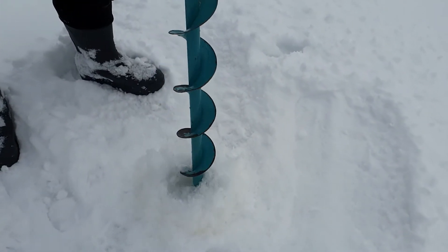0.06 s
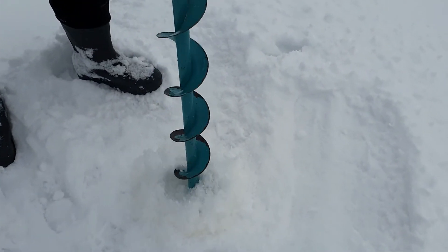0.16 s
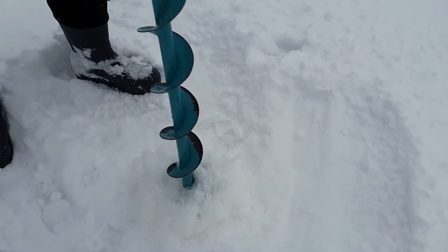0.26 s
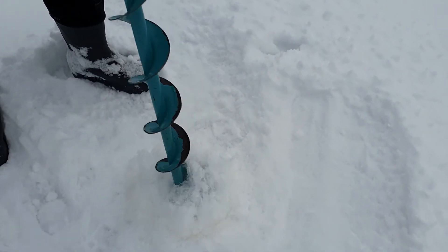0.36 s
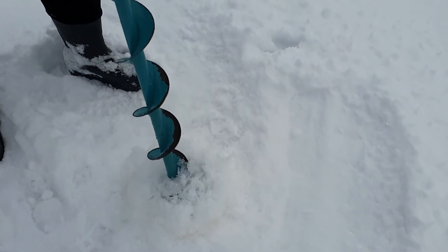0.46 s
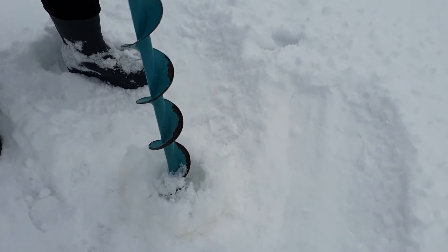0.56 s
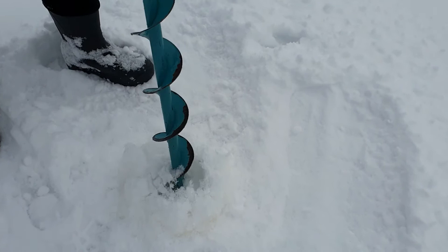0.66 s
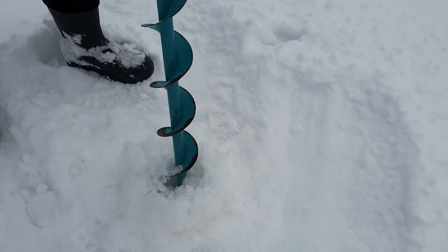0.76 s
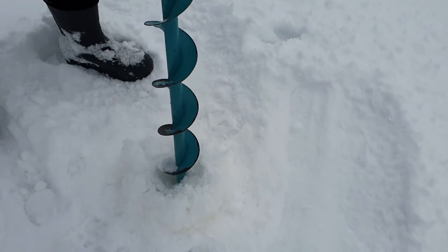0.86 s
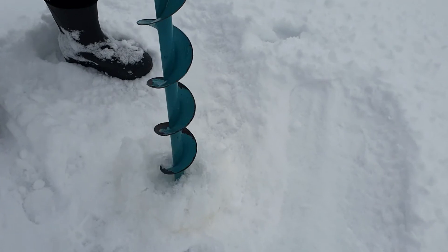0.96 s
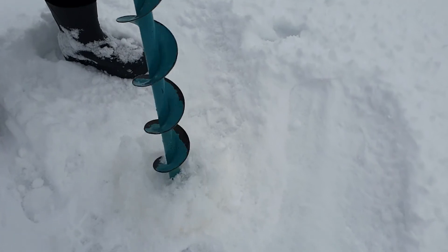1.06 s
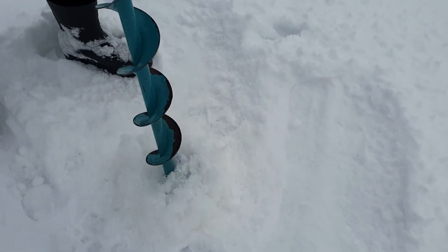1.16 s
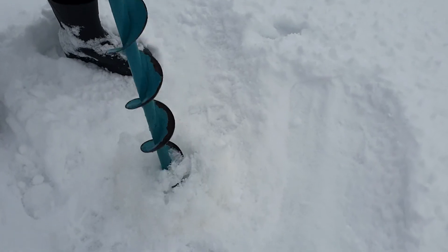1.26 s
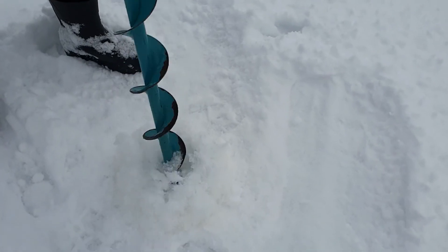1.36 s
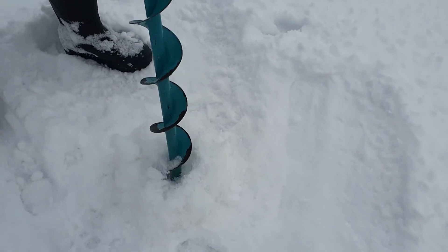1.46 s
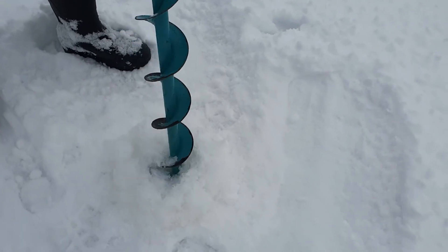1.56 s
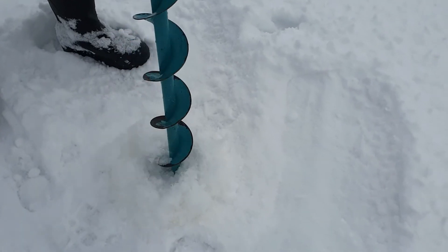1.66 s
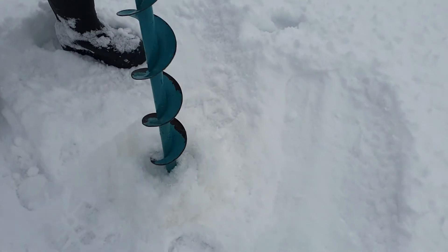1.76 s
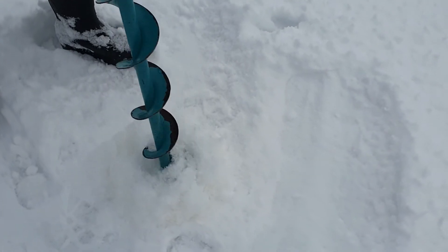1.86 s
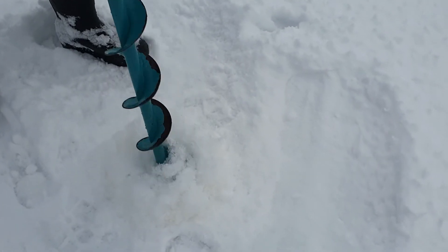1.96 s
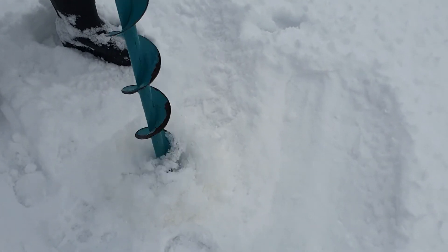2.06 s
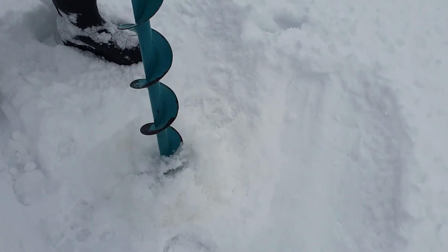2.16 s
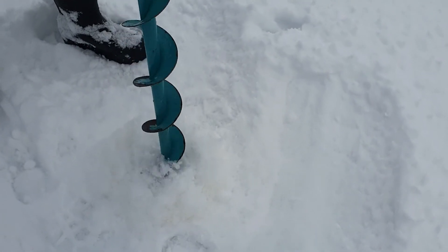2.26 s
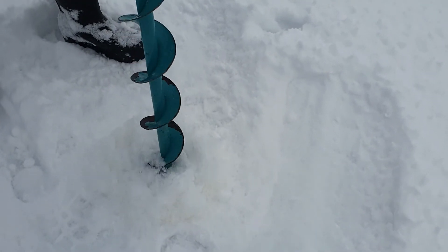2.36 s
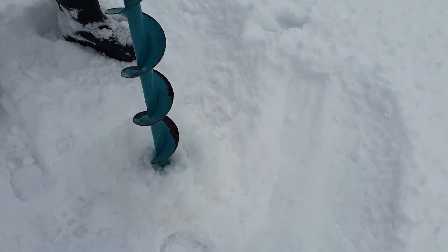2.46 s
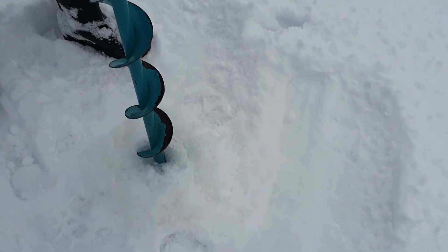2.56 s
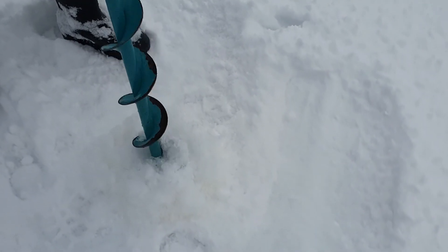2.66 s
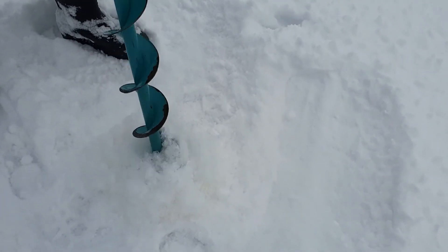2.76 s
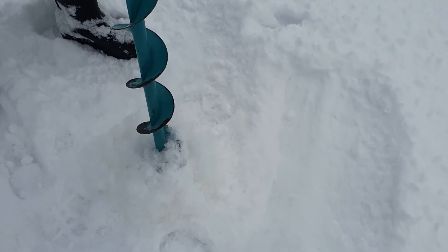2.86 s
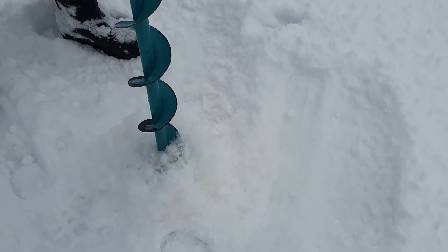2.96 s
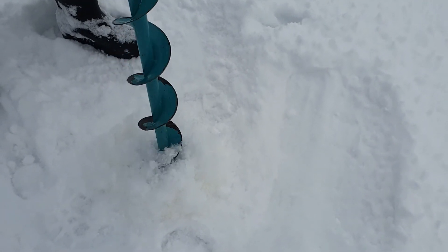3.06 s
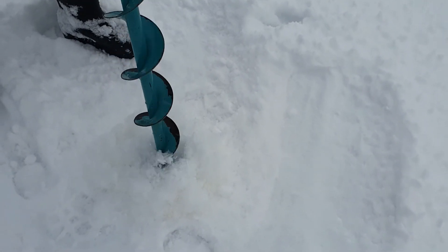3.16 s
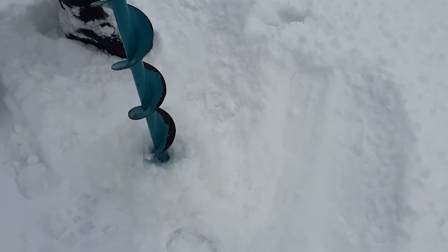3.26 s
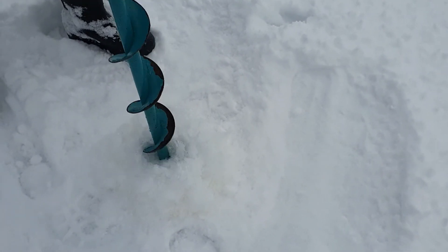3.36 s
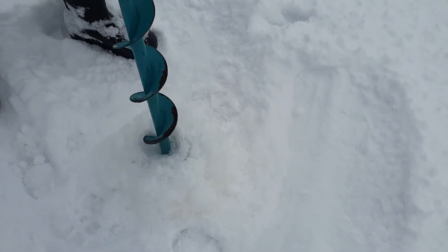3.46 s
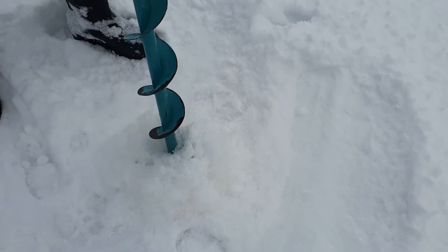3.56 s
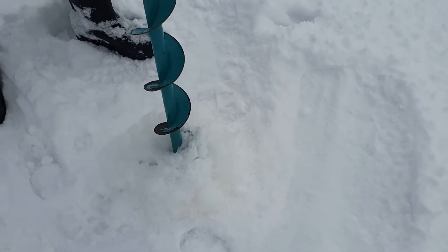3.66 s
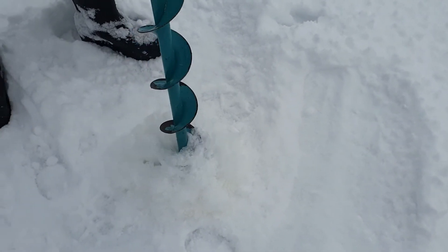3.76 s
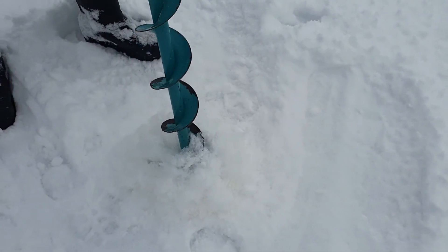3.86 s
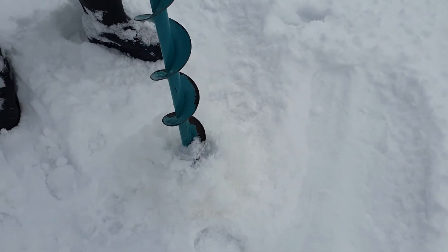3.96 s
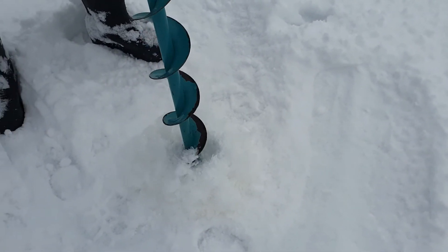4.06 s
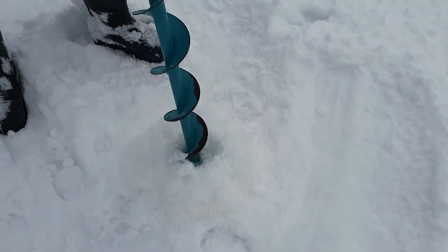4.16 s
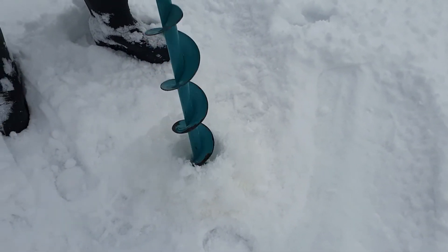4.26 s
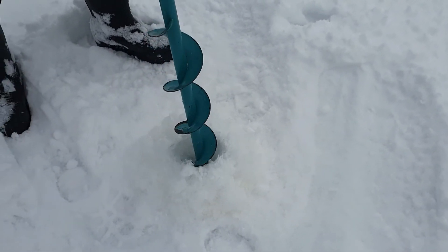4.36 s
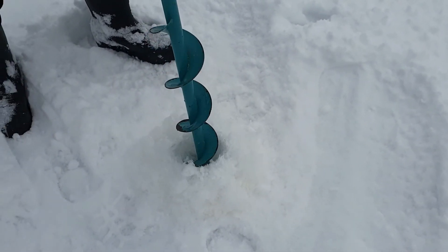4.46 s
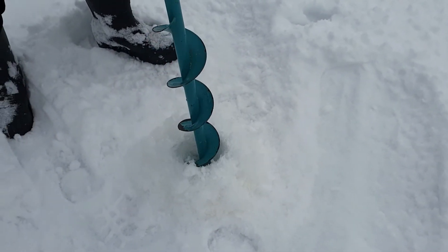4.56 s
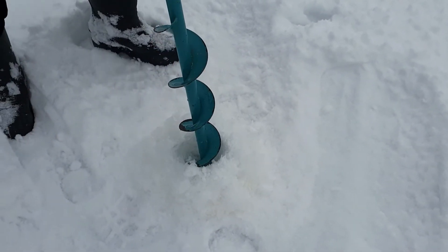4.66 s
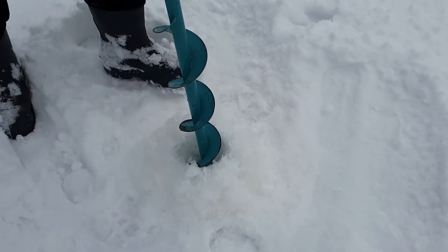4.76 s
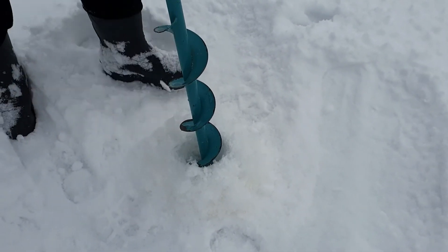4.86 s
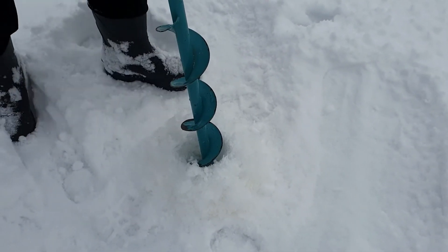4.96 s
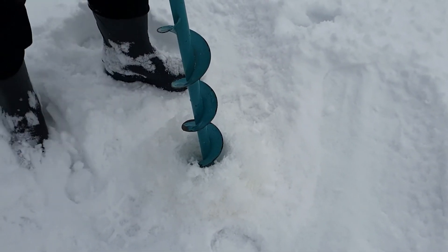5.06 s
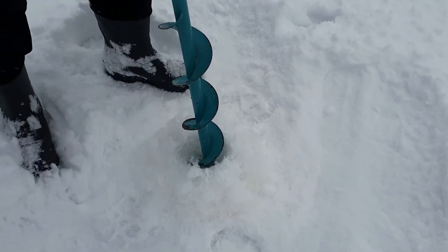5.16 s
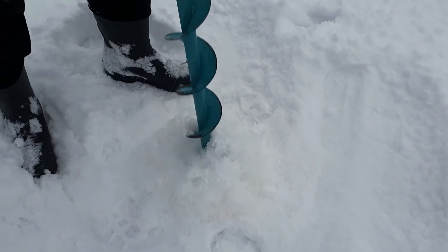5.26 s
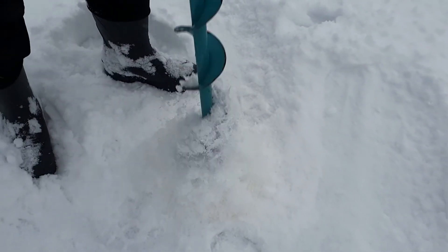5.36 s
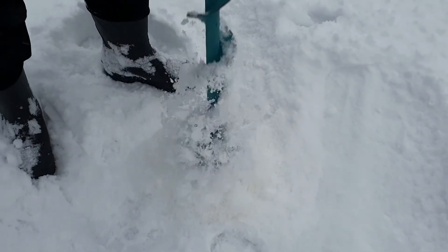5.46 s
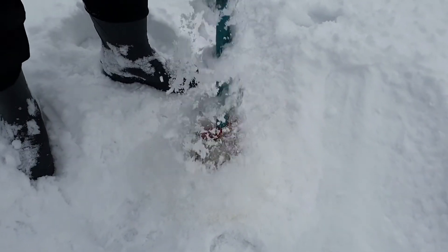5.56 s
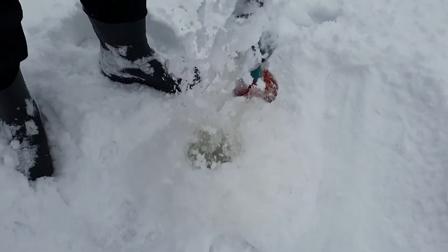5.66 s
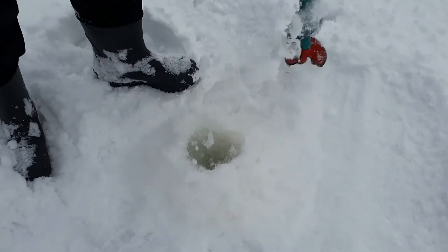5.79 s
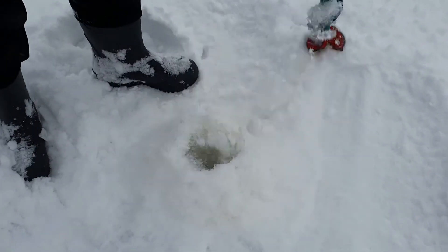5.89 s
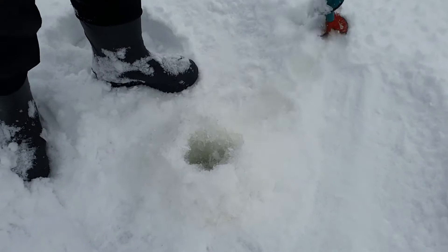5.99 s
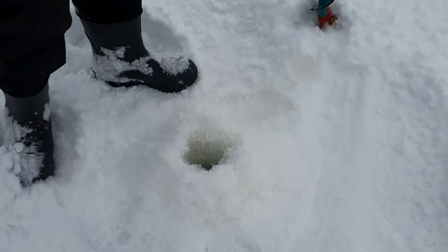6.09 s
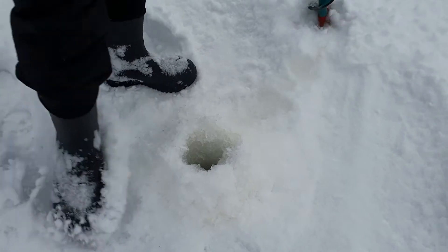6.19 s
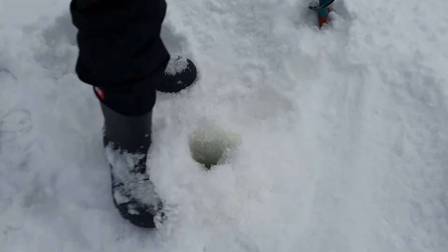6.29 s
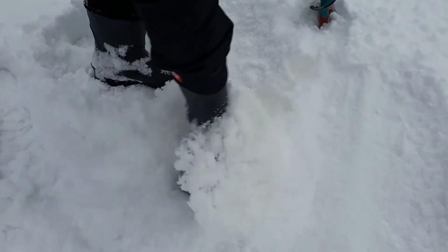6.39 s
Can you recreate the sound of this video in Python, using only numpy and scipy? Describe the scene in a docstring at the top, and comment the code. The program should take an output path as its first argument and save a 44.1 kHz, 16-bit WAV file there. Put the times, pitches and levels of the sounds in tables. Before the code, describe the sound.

Close, crunchy scraping of a steel ice auger stops suddenly, followed by a wet pull, falling slush and boots in snow.

```python
"""On a frozen river, close by, a hand auger (a big drill) bores through the ice: its blades chip away,
its steel spiral rings and the ice sheet throbs. It breaks through and falls quiet. Boots shift in the
snow, then the spiral is hauled out, scraping the wall of the hole while water gurgles behind it.
Slush hisses off it and lands in lumps, the steel clinks as it is set down, and the boots step aside."""
import sys
import numpy as np
from scipy import signal
from scipy.fft import rfft, irfft
from scipy.io import wavfile
from scipy.ndimage import uniform_filter1d, map_coordinates

SR = 44100
rng = np.random.default_rng(int(sys.argv[2]) if len(sys.argv) > 2 else 0)


def log_audio(samples):
    """Write samples as a 16-bit WAV file to the path given in sys.argv[1]."""
    # one column per channel
    frames = np.atleast_2d(samples).T
    # limit to full scale, then quantise
    limited = np.clip(frames, -1, 1)
    pcm = np.round(limited * 32767).astype(np.int16)
    wavfile.write(sys.argv[1], SR, pcm)


N = 283563
TIME, HZ = np.arange(N) / SR, np.fft.rfftfreq(N, 1 / SR)
TURN_S = 0.7226  # one turn of the crank
BREAK_S, FREE_S = 4.252, 4.372  # the blades break through, then run free


def amp(db):
    """Turns decibels into a number to multiply by."""
    return 10 ** (np.asarray(db) / 20)

def unit(x):
    """Scales a signal to an average power of 1."""
    return x / np.sqrt(np.mean(x ** 2) + 1e-20)

def read(points, hz):
    """Looks up hz on a curve of (pitch_hz, value) points."""
    pitch, value = np.transpose(points)
    return np.interp(np.log(hz + 1), np.log(pitch + 1), value)

def ramp(start_s, length_s):
    """Goes steadily from 0 to 1."""
    return np.clip((TIME - start_s) / length_s, 0, 1)

def humps(rows):
    """Adds up smooth humps from rows of (middle_s, half_length_s, height)."""
    return sum(height * np.exp(-((TIME - at) / half) ** 2) for at, half, height in rows)

def swell(start_s, db, rise_s, decay_s):
    """A loudness curve that rises smoothly to db and dies away."""
    t = np.maximum(TIME - start_s, 0)
    shape = (1 - np.exp(-(t / rise_s) ** 2)) * np.exp(-t / decay_s)
    return amp(db) * shape / (shape.max() + 1e-9)

def swells(rows):
    """Overlapping swells, added in power."""
    return np.sqrt(sum(swell(*row) ** 2 for row in rows))

def wander(rate_hz):
    """A smooth random drift, about 1 in size."""
    return unit(irfft(rfft(rng.standard_normal(N)) / (1 + (HZ / rate_hz) ** 4), N))

def crackle(per_s, spread_db, decay_s):
    """The loudness curve of many tiny, sudden cracks; a few are large."""
    size = amp(spread_db * np.minimum(rng.exponential(1, N), 4))
    cracks = size * (rng.random(N) < per_s / SR)
    power = signal.lfilter([1], [1, -np.exp(-2 / (decay_s * SR))], cracks ** 2)
    return unit(np.sqrt(power + 1e-12))

def colour(x, db_at, size=4096):
    """Shapes lows and highs by the curve db_at(hz); white noise keeps its power."""
    gain_db = np.maximum(db_at(abs(np.fft.fftfreq(size, 1 / SR))), -110)
    response = np.exp(signal.hilbert(np.log(amp(gain_db))).conj())  # rings only after a hit
    taps = np.fft.ifft(response).real[:size // 2]
    return signal.oaconvolve(x, taps[None] / np.linalg.norm(taps), axes=1)[:, :N]

def resonate(x, hz, width_hz):
    """Makes x ring at a steady or moving pitch; a narrower width rings longer."""
    spin = np.exp(2j * np.pi * np.cumsum(np.broadcast_to(hz, N)) / SR)
    keep = np.exp(-np.pi * width_hz / SR)
    once = signal.lfilter([1 - keep], [1, -keep], x / spin)
    return (spin * signal.lfilter([1 - keep], [1, -keep], once)).real

# How alike left and right are (1 = the same): pitch_hz, likeness
STEREO_LIKENESS = [(40, .7), (160, .995), (1000, .94), (2500, .93), (4000, .75), (7000, .55), (10000, .25)]
# How far the left side runs ahead: pitch_hz, lead_radians
LEFT_LEAD = [(200, 0), (1400, .28), (3500, .55), (5700, 1.65), (8400, 2.0), (15000, 1.6)]
def hiss():
    """Stereo white noise, most alike in the low and middle range, a little louder on the right."""
    left, other = rfft(rng.standard_normal((2, N)))
    same = read(STEREO_LIKENESS, HZ)
    right = (same * left + np.sqrt(1 - same ** 2) * other) * np.exp(-1j * read(LEFT_LEAD, HZ))
    return irfft(np.array([left, right]) * amp([[-0.35], [0.35]]), N)


# Where the auger rings as it stands in the ice: pitch_hz, width_hz, boost_db
STEEL_RINGS = [(158.1, 67, 16), (662, 56, 6), (1122, 200, 6.5), (1484, 90, 6.5), (1783, 90, 6.5),
               (2041, 44, 8.5), (2175, 120, 4), (2450, 40, 1.5), (2750, 70, 8), (3090, 190, 6.5),
               (3400, 130, 8.5), (5340, 59, 10.5), (5915, 33, 12.5), (6614, 92, 8.5)]
def steel_db(hz):
    """The boost that the ringing auger gives each pitch."""
    return sum(db / (1 + (2 * (hz - pitch) / width) ** 2) for pitch, width, db in STEEL_RINGS)

# The tone of breaking ice: pitch_hz, level_db
ICE_TONE = [(35, -34), (70, -19), (115, -24), (220, -12), (380, -16), (900, -13.5), (2000, -11.5),
            (3300, -19.5), (4600, -24), (7300, -19.5), (8100, -25.5), (16000, -35.5)]
def auger(x, low_hz, high_hz):
    """One band of breaking ice, rung through the auger."""
    def gain_db(hz):
        outside = (1 + (low_hz / (hz + 1)) ** 10) * (1 + (hz / high_hz) ** 10)
        return read(ICE_TONE, hz) + steel_db(hz) - 10 * np.log10(outside)
    return colour(x, gain_db)

def crank(peak_s):
    """Swings between -1 and 1 once a turn, with a top at peak_s."""
    return np.cos(2 * np.pi * (TIME - peak_s) / TURN_S)

def flex(x, pitch_share=0.005, loaded_s=0.598):
    """The crank bends the shaft, so the pitch drifts up and down once a turn."""
    lead_s = pitch_share * TURN_S / (2 * np.pi) * crank(loaded_s + TURN_S / 4)
    return np.array([map_coordinates(side, [(TIME + lead_s) * SR], order=3, mode="mirror") for side in x])

def crumbs(x, depth_db):
    """Coarse and fine crumbs take turns, so the tone shifts in small patches."""
    spectrum = signal.stft(x, nperseg=1024)[2]
    patches = uniform_filter1d(rng.standard_normal(spectrum.shape[1:]), size=7, axis=0)
    patches = unit(uniform_filter1d(patches, size=5, axis=1))
    return signal.istft(spectrum * amp(depth_db * patches))[1][:, :N]

# The arm leans in or eases off: middle_s, half_length_s, change_db
ARM_PUSHES = [(.68, 0.11, -4), (1.45, 0.036, -2), (1.89, 0.045, 2), (.38, 0.087, 1), (3.31, 0.018, 0.5),
              (3.44, 0.041, -5), (3.93, 0.048, -4), (4.1, 0.02, 1), (4.325, 0.011, 4.5)]
# Once a turn the blades dig in and shave keenly: start_s, boost_db
KEEN_CUTS = [(0, 8), (.76, 7), (1.49, 6), (2.17, 3.5), (2.94, 3), (3.56, 4.5)]
def cutting(fade_db_per_s=128):
    """How hard the blades bite, and how loud the shaving is next to that, both in dB."""
    through = ramp(BREAK_S, 0.0036)
    bite_db = -21 + humps(ARM_PUSHES) - 9 * through
    bite_db -= 13.5 * ramp(FREE_S, 0.021) + fade_db_per_s * np.maximum(TIME - FREE_S, 0)
    keen_db = sum(db * swell(start, 0, rise_s=0.053, decay_s=0.37) for start, db in KEEN_CUTS)
    muffle_db = 1.5 * ramp(1.9, 0.05)  # chips pack the hole
    shave_db = -10.5 + keen_db - muffle_db + 16 * through - 4 * ramp(FREE_S, 0.017)
    return bite_db, shave_db

# The blades catch and stand for a moment: middle_s, half_length_s, drop_db
BLADE_CATCHES = [(.623, .006, 13), (.668, .008, 15), (4.29, .008, 9), (4.356, .008, 9)]
def blades():
    """The same cracks make a coarse grind, fine shaving and a fizz of powder, over singing steel."""
    bite_db, shave_db = cutting()
    slack_db = humps([(at - .005, .006, 3) for at, _, _ in ICE_CHIPS])  # a dip just before each chip
    bite = amp(bite_db - humps(BLADE_CATCHES) - slack_db)
    cracks = crackle(per_s=950, spread_db=2.4, decay_s=.0014) + .6
    cracks *= amp(2.1 * np.tanh(wander(rate_hz=30)))  # the ice gives way in clusters
    cracks /= np.sqrt(uniform_filter1d(cracks ** 2, size=4000))  # but the blades sink steadily
    grind = auger(hiss() * cracks * bite, low_hz=393, high_hz=3030)
    grind = amp(-1) * crumbs(grind, depth_db=1.97)
    fine = hiss() * cracks * bite
    shaving = amp(1) * auger(fine * amp(shave_db), low_hz=3340, high_hz=8730)
    powder_db = -5 + 0.43 * shave_db + 5.1 * (TIME > BREAK_S)
    powder = amp(powder_db) * auger(fine, low_hz=8020, high_hz=16430)
    squeal = amp(shave_db - 13.5) * steel_tone(5830, drift_hz=110, width_hz=400, flare_db=4)
    return flex(grind + crumbs(shaving + powder, depth_db=2.5)) + bite * (singing() + squeal)

def steel_tone(pitch_hz, drift_hz, width_hz, flare_db):
    """The steel answers the scraping edge at a drifting pitch, flaring up and fading."""
    hz = pitch_hz + drift_hz * wander(rate_hz=4)
    return unit(resonate(hiss(), hz, width_hz) * amp(flare_db * np.tanh(wander(rate_hz=7.2))))

# The notes of the spiral: pitch_hz, width_hz, level_db, swing_db, climb_hz
SPIRAL_NOTES = [(1490, 70, -14, 1, 0), (2050, 55, -10.5, 2, 0), (2120, 110, -9, 4, 320),
                (2740, 110, -14.5, 5, 0)]
def singing():
    """Scraping keeps the steel ringing; in each turn the ring swells and one note climbs."""
    climb, load = (TIME / TURN_S % 1) ** 3, crank(peak_s=0.39)
    notes = 0
    for hz, width, db, swing_db, climb_hz in SPIRAL_NOTES:
        note = steel_tone(hz + climb_hz * climb, drift_hz=12, width_hz=width, flare_db=3)
        notes += amp(db) * unit(note * amp(swing_db * load))
    return notes * amp(-12 * ramp(BREAK_S, 0.1))  # the load goes as the blades break through

# The ice takes more or less of the weight: middle_s, half_length_s, change_db
ICE_HEAVES = [(1.52, 0.033, -7), (1.78, 0.017, 7), (2.8, 0.016, 5.5), (3.83, 0.03, 5)]
def ice_sheet(lurches_per_s=11):
    """The ice throbs low, swelling with each slightly uneven lurch of the blades."""
    lurch = np.sin(2 * np.pi * np.cumsum(lurches_per_s + wander(rate_hz=2.66)) / SR)
    throb_db = -34.5 + humps(ICE_HEAVES) + 1.5 * lurch + 1.2 * wander(rate_hz=3.2)
    throb = amp(throb_db) * (1 - ramp(BREAK_S, 0.16))
    return auger(hiss() * throb, low_hz=29.4, high_hz=347)

# The tone of open air: pitch_hz, level_db
AIR_TONE = [(25, -2), (80, 0), (200, -17), (2000, -23), (6500, -26), (16000, -34)]
def air():
    """Open air rumbles faintly throughout."""
    return amp(-64) * colour(hiss(), lambda hz: read(AIR_TONE, hz))

# The cutting edge skids: middle_s, half_length_s, level_db, pitch_hz
EDGE_SKIDS = [(.1, 0.063, -25, 3200), (0.835, 0.028, -25, 3110), (1.88, 0.083, -24, 2700)]
def skids():
    """Each skid draws a short metallic rasp from the spiral."""
    grips = np.array([humps([(at, half, amp(db))]) for at, half, db, _ in EDGE_SKIDS]) + 1e-9
    hz = np.average([[pitch] for *_, pitch in EDGE_SKIDS] * np.ones(N), axis=0, weights=grips)
    rasp = colour(resonate(hiss(), hz, width_hz=520), steel_db)
    return unit(rasp * amp(2 * wander(rate_hz=47))) * grips.sum(0)

# Larger chips of ice: start_s, level_db, pitch_hz
ICE_CHIPS = [(.468, -17, 1750), (.6295, -19, 2380), (.6748, -17.5, 2420), (.9751, -17, 2150),
             (1.264, -17, 1200), (1.4779, -18, 2000), (2.184, -16, 1800), (2.222, -16, 1750),
             (2.5246, -16.5, 1650), (3.0239, -18, 2200), (3.1651, -16, 2650), (3.203, -15.5, 2000),
             (3.6485, -15.5, 1550), (3.6749, -17, 1700), (3.873, -16, 2000), (3.9847, -15.5, 2450),
             (4.093, -15.5, 1350), (4.1139, -14.5, 1800), (4.2337, -16.5, 1900), (4.263, -25, 3400),
             (4.299, -23, 3400), (4.3639, -20.5, 2750), (4.5236, -50, 3300), (5.566, -29, 2100)]
def chips(rise_s=0.0012, decay_s=0.0034):
    """Each chip snaps against the steel: a short burst of noise with its own pitch."""
    out, noise, t = np.zeros((2, N)), hiss(), TIME[TIME < 10 * decay_s]
    shape = (1 - np.exp(-t / rise_s)) * np.exp(-t / decay_s)
    for start_s, db, pitch in ICE_CHIPS:
        def gain_db(hz):
            off_pitch = 4.6 * (hz / pitch - pitch / (hz + 1))
            return 0.72 * steel_db(hz) - 10 * np.log10(1 + off_pitch ** 2)
        start = round(start_s * SR)
        snap = colour(noise[:, start:start + len(t)] * shape, gain_db)
        strength = np.sqrt(np.mean(snap[:, :round(2 * decay_s * SR)] ** 2))
        out[:, start:start + snap.shape[1]] += amp(db) * snap / strength
    return out

# Dull blows of boots, auger and slush lumps: start_s, level_db, pitch_hz, decay_s, relative_crunch_db
BLOWS = [(4.244, -28, 100.5, 0.01, -20), (4.723, -34.5, 164, 0.0073, -15), (4.882, -34.5, 123, 0.022, -12),
         (5.0604, -19.5, 190, 0.0077, -10.5), (5.196, -34, 100, .009, -20), (5.242, -26.5, 175, 0.0086, -4),
         (5.323, -16, 160, 0.007, -4.5), (5.488, -25, 333, 0.0075, -14), (5.815, -13, 448, 0.0043, -10.5),
         (5.835, -10.5, 550, 0.0023, -14), (5.842, -29, 129, 0.017, -10), (5.873, -17, 119, 0.0051, -13.5),
         (5.966, -37, 155, 0.011, -10.5), (6.028, -36.5, 169, 0.013, -2), (6.107, -26.5, 216, 0.0082, -8.5),
         (6.154, -33, 105, 0.015, -18), (6.184, -23.5, 122, 0.0086, -6.5), (6.3, -27.5, 299, 0.0057, -11.5),
         (6.422, -15, 520, 0.0033, -7)]
# A boot rolls its weight onto the snow: start_s, level_db, rise_s, decay_s
BOOT_STEPS = [(4.85, -50, 0.023, 0.031), (4.95, -56, 0.016, 0.48), (5.16, -42, 0.022, 0.011),
              (6.26, -38.5, 0.011, 0.13), (6.33, -36, 0.026, 0.043), (6.39, -30, 0.027, 0.052)]
# The tone of snow packed under a sole: pitch_hz, level_db
SNOW_TONE = [(100, -10), (220, -3), (1300, -9.5), (2000, -15.5), (6000, -20), (16000, -27)]
def thuds_and_steps(pitch_sag=0.13):
    """Each blow is a short thump that sinks in pitch; snow crunches under blows and boots."""
    thumps, weight = np.zeros(N), np.zeros(N)
    for start, db, hz, decay, crunch_db in BLOWS:
        t = np.maximum(TIME - start, 0)
        shape = swell(start, db, 0.22 * decay, decay)
        stretch = 1 + pitch_sag * (1 - np.exp(-t / decay / 2))
        thumps += shape * np.sin(2 * np.pi * hz * t / stretch)
        weight += shape * amp(crunch_db)
    thumps = signal.sosfilt(signal.butter(3, 55, "high", fs=SR, output="sos"), thumps)
    grains = hiss() * unit(crackle(per_s=1300, spread_db=1.5, decay_s=0.0011) + .5)
    crunch = colour(grains * (weight + swells(BOOT_STEPS)), lambda hz: read(SNOW_TONE, hz))
    rumble_tone = [(30, -17), (110, -1.5), (250, -7), (900, -10.5), (3000, -37.5)]  # pitch_hz, level_db
    rumble = colour(hiss() * weight, lambda hz: read(rumble_tone, hz))
    return amp(-0.5) * thumps + amp(1) * crunch + amp(4.5) * rumble

# Slush pours off the spiral and snow slides: start_s, level_db, rise_s, decay_s
SLUSH_POURS = [(5.15, -50, 0.026, 0.016), (5.26, -39.5, 0.023, 0.34), (5.366, -30.5, 0.0023, 0.013),
               (5.54, -39.5, 0.19, 0.44), (5.98, -38, 0.024, 0.049), (6.184, -33, 0.0008, 0.0053),
               (6.37, -42, 0.018, 0.085)]
# The tone of the spray: pitch_hz, level_db
SPRAY_TONE = [(150, -10), (1200, -10), (4000, -6.5), (7000, -7), (16000, -5.5)]
def slush():
    """Wet grains patter onto the snow while water fans out to both sides."""
    flow = swells(SLUSH_POURS)
    grains = hiss() * crackle(per_s=3500, spread_db=5, decay_s=0.0007)
    water = rng.standard_normal((2, N))
    return colour((amp(3) * grains + amp(4.5) * water) * flow, lambda hz: read(SPRAY_TONE, hz))

# The spiral bumps along the wall: start_s, level_db, rise_s, decay_s, ring_db
WALL_BUMPS = [(5.282, -37, 0.0054, 0.0075, -37), (5.315, -17, 0.0037, 0.014, -27),
              (5.341, -32, 0.0032, 0.0056, -21), (5.364, -16, 0.0034, 0.019, -23),
              (5.475, -23, 0.01, 0.0093, -19.5), (5.528, -27.5, 0.0043, 0.0081, -24)]
# The tone of scraped wet ice: pitch_hz, level_db
WALL_TONE = [(60, -13), (160, -16), (240, -2), (550, -2.5), (1100, -1), (3400, -6), (4400, -14),
             (7000, -17), (16000, -46)]
def haul(start_s=5.375, end_s=5.49, empty_hz=290, filled_hz=1150):
    """The spiral scrapes up the hole and rings at each bump; the hole sounds higher as water fills it."""
    before_s, after_s = np.maximum(start_s - TIME, 0), np.maximum(TIME - end_s, 0)
    slide = amp(-25.5 - 257 * before_s - 274 * after_s)
    contact = np.hypot(slide, swells([row[:-1] for row in WALL_BUMPS]))
    grains = hiss() * unit(crackle(per_s=1300, spread_db=3.4, decay_s=.0022) + .5)
    scrape = colour(grains * contact, lambda hz: read(WALL_TONE, hz) + 0.5 * steel_db(hz))
    ringing = swells([(at, ring_db, rise, decay) for at, _, rise, decay, ring_db in WALL_BUMPS])
    ring = unit(resonate(hiss(), hz=2080, width_hz=170)) * ringing
    hole_hz = empty_hz * (filled_hz / empty_hz) ** ramp(start_s, 0.27) * amp(wander(rate_hz=21))
    hole = unit(resonate(hiss(), hole_hz, width_hz=140)) * swell(start_s, -31, 0.089, 0.068)
    return amp(1.4) * scrape + ring + hole

def gurgle(bubbles=40, decay_cycles=6, start_s=5.36, length_s=0.15, lowest_hz=290):
    """Water sucked up behind the spiral traps bubbles, each gliding upward as it dies."""
    out = np.zeros(N)
    for when, height, strength in rng.random((bubbles, 3)):
        hz = lowest_hz * 3.4 ** height
        t = np.maximum(TIME - start_s - length_s * when, 0)
        age = t * hz / decay_cycles
        out += strength * np.exp(-age) * np.sin(2 * np.pi * hz * t * (1 + 0.052 * age))
    return amp(-23) * out

# The notes of the knocked steel: pitch_hz, width_hz, level_db
CLINK_NOTES = [(1950, 890, -10), (3010, 330, -9.5), (4760, 310, -17), (7000, 400, -10)]
def clink(start_s=6.2267):
    """One bright knock on the steel as the auger is set down."""
    ring = sum(amp(db) * unit(resonate(hiss(), hz, width)) for hz, width, db in CLINK_NOTES)
    return unit(ring + .5 * hiss()) * swell(start_s, db=-23, rise_s=0.00079, decay_s=0.012)


def scene():
    """Drilling in the open air, then the steps and the pull."""
    drilling = blades() + ice_sheet() + air() + skids() + chips()
    return drilling + thuds_and_steps() + slush() + haul() + gurgle() + clink()

def record(dry, top_hz=16050):
    """Softens the high treble and cuts off everything above top_hz."""
    softened = irfft(rfft(dry) * amp(read([(7200, -1), (7900, -6)], HZ)), N)
    low_pass = signal.firwin(511, top_hz, window=("kaiser", 9), fs=SR)
    return signal.oaconvolve(softened, low_pass[None], "same")


dry = scene()
out = record(dry)
log_audio(out)
```